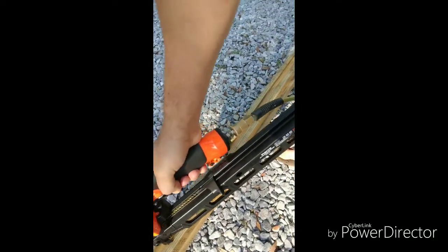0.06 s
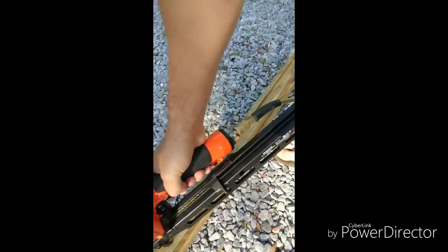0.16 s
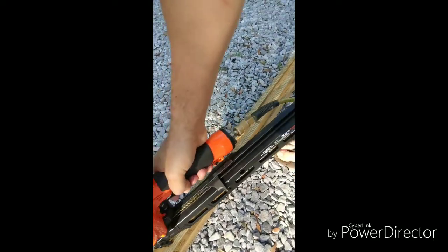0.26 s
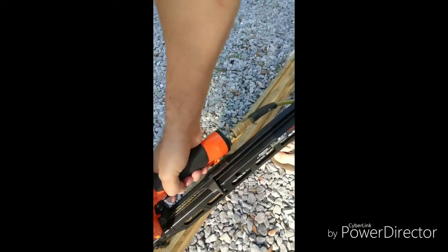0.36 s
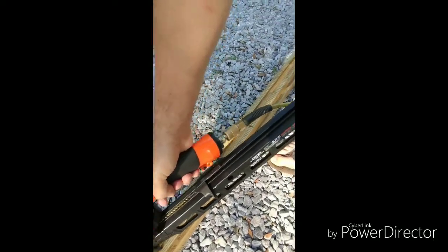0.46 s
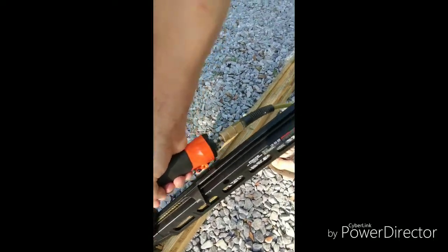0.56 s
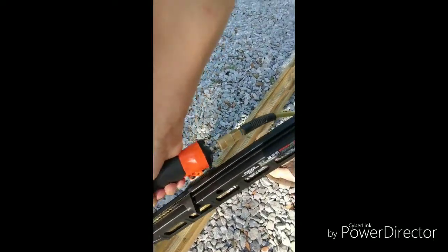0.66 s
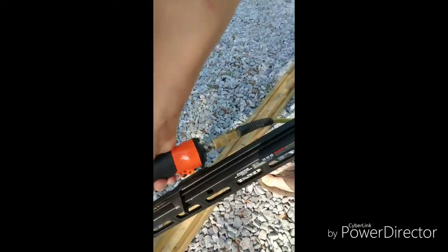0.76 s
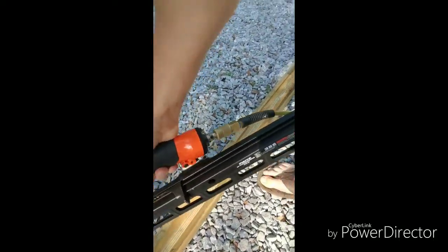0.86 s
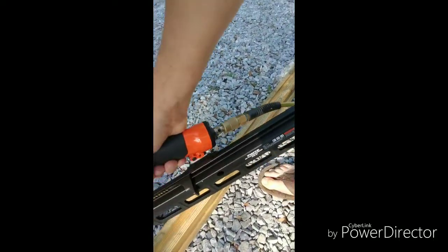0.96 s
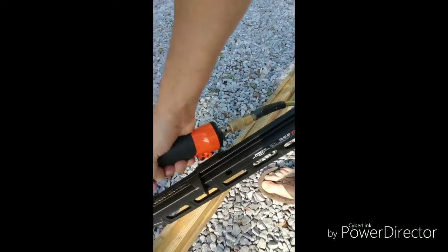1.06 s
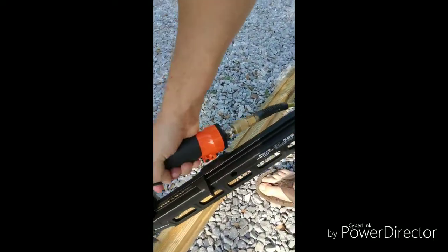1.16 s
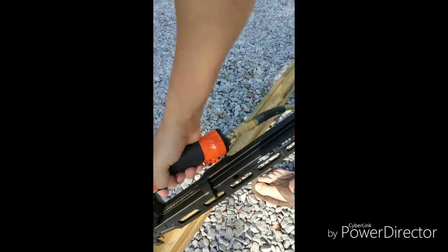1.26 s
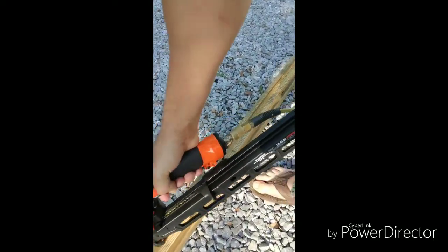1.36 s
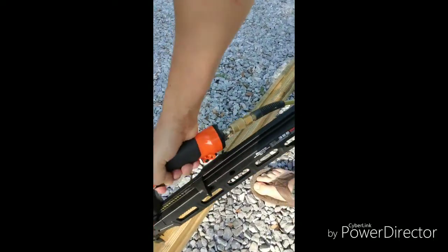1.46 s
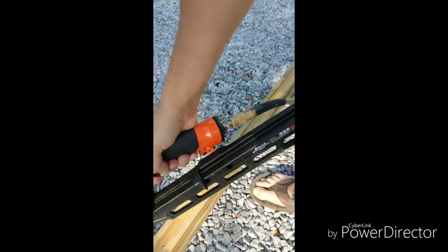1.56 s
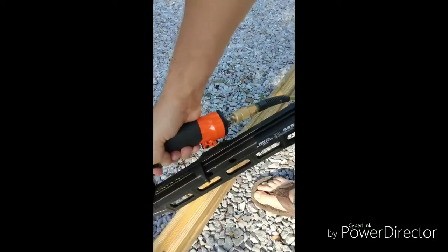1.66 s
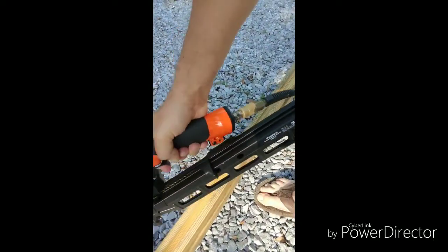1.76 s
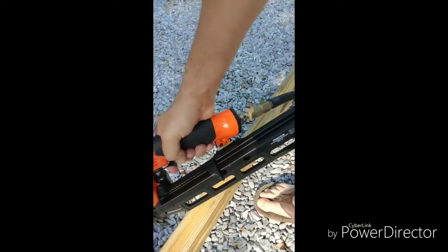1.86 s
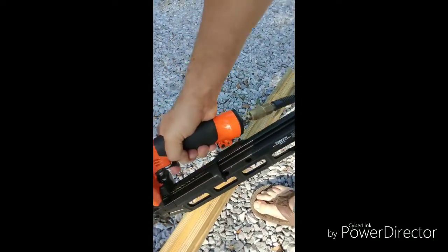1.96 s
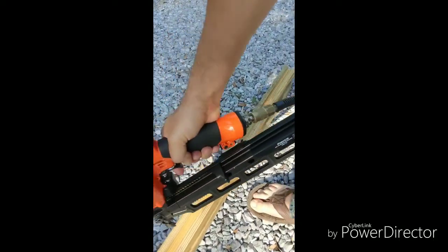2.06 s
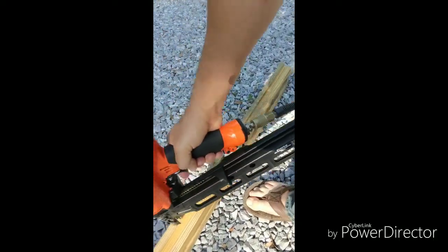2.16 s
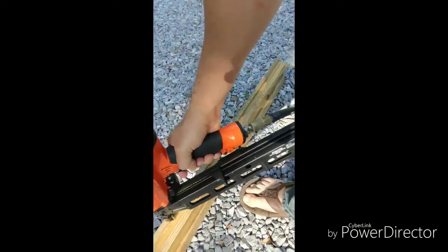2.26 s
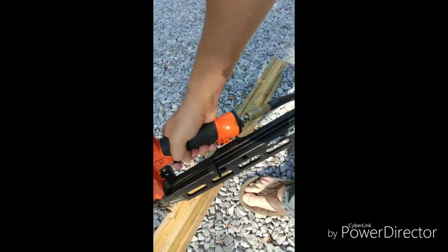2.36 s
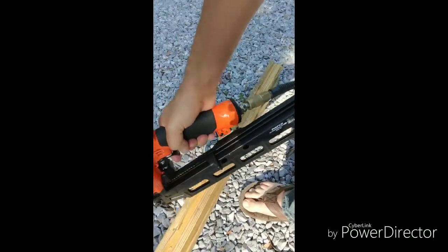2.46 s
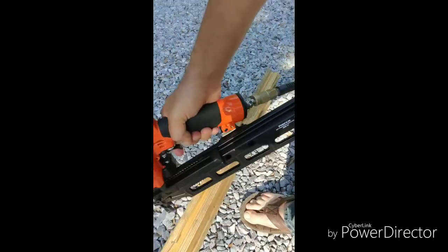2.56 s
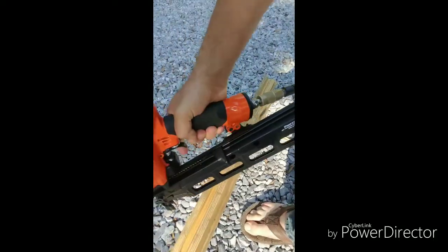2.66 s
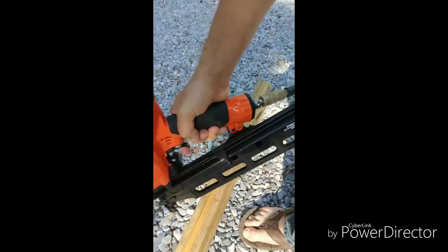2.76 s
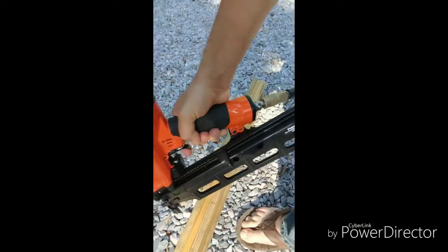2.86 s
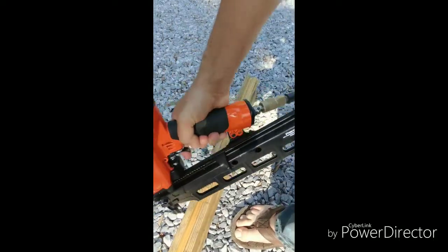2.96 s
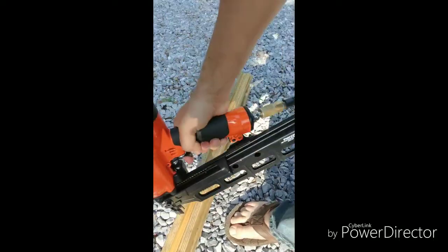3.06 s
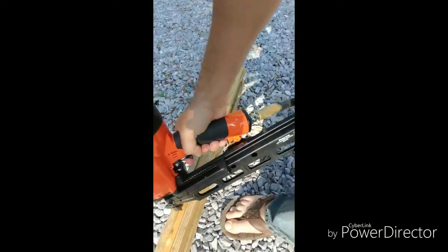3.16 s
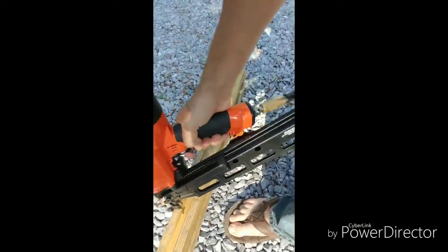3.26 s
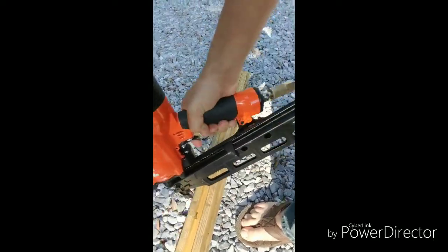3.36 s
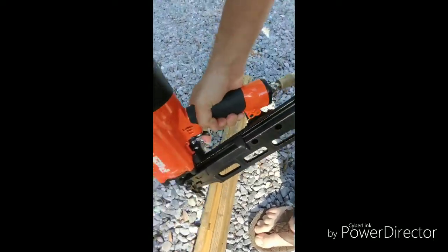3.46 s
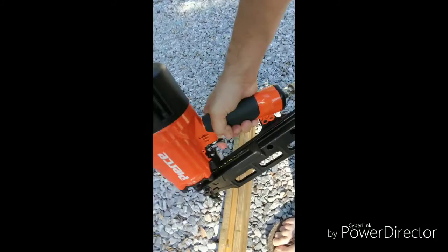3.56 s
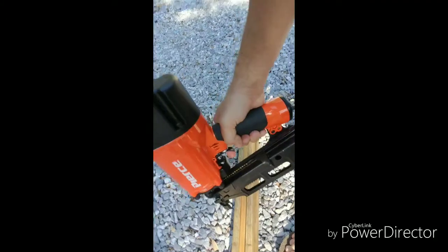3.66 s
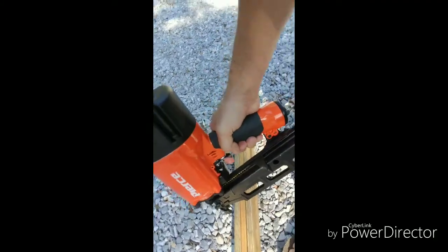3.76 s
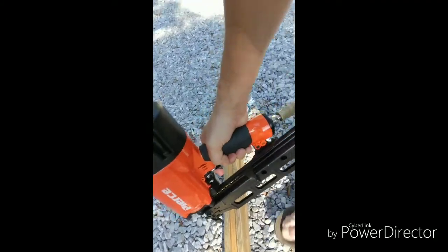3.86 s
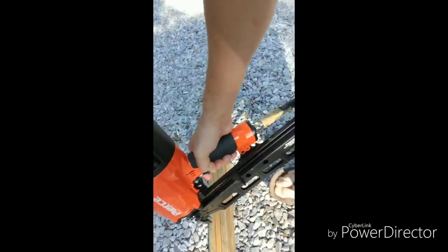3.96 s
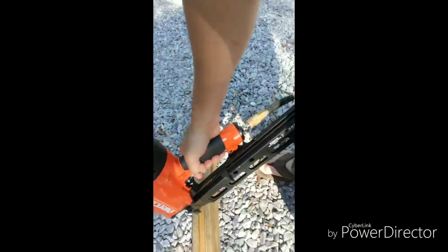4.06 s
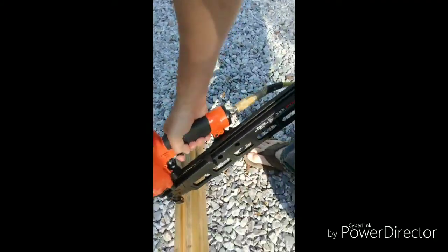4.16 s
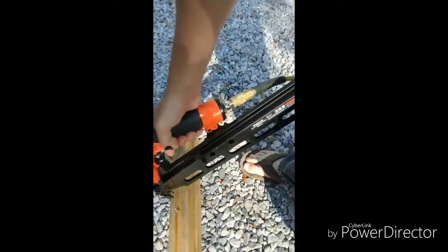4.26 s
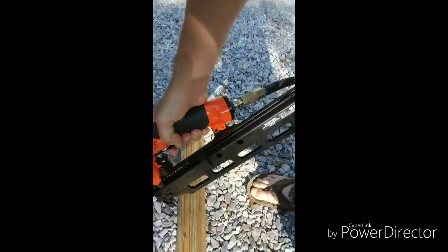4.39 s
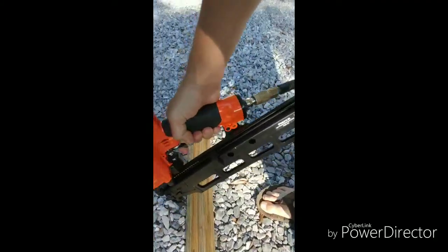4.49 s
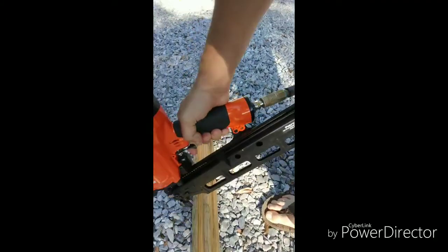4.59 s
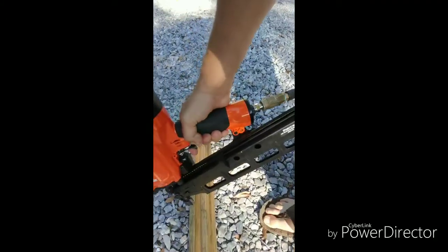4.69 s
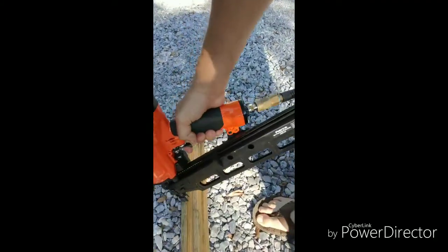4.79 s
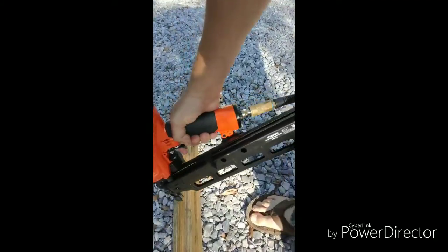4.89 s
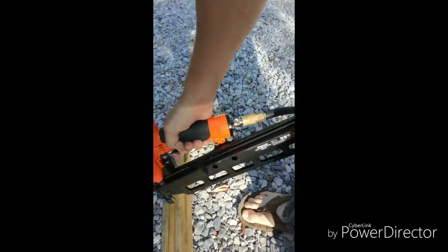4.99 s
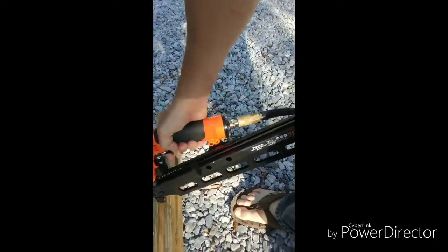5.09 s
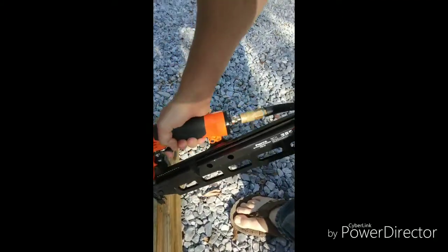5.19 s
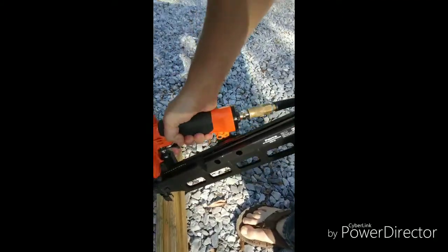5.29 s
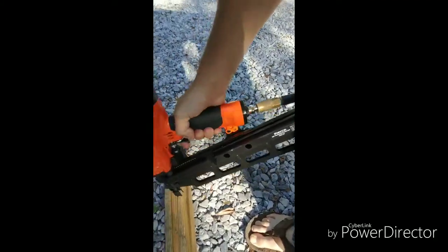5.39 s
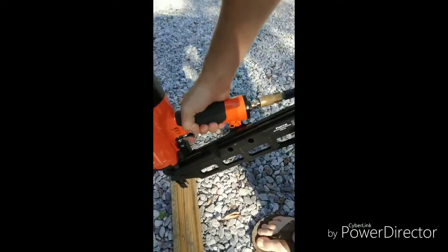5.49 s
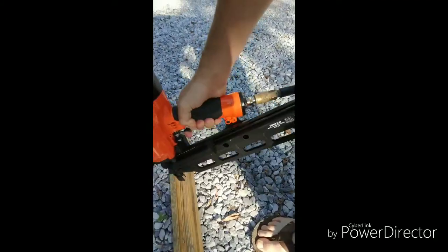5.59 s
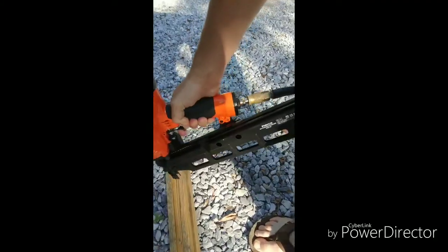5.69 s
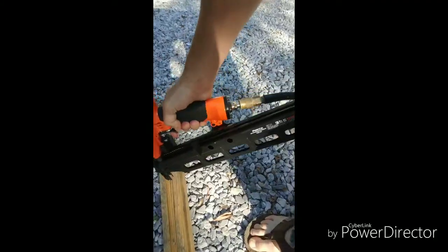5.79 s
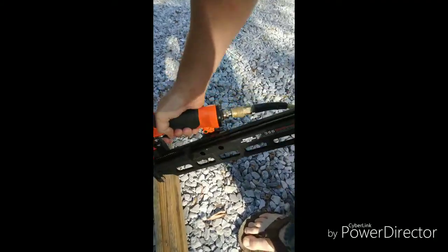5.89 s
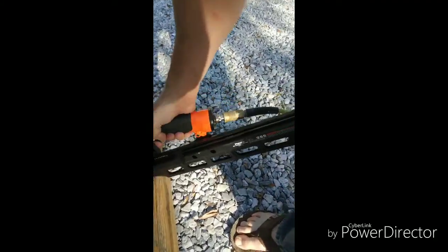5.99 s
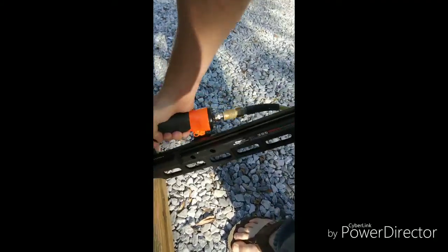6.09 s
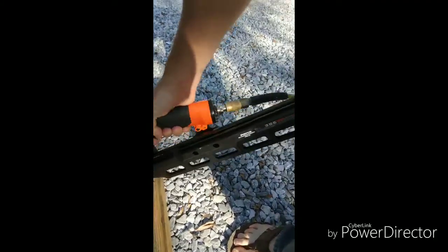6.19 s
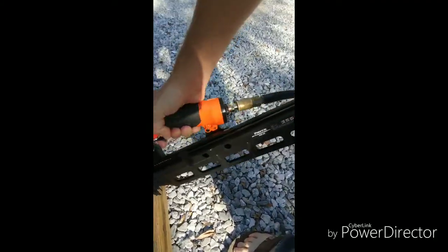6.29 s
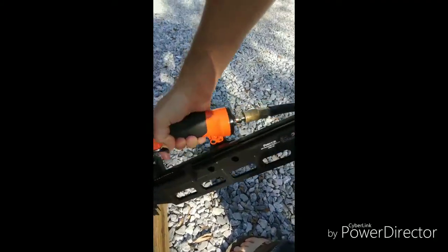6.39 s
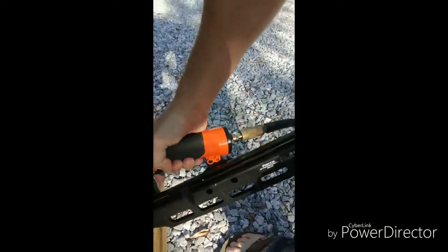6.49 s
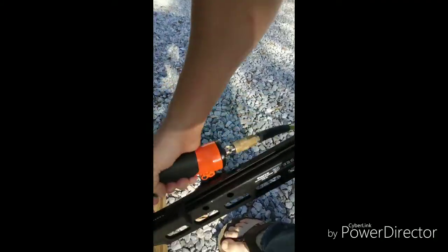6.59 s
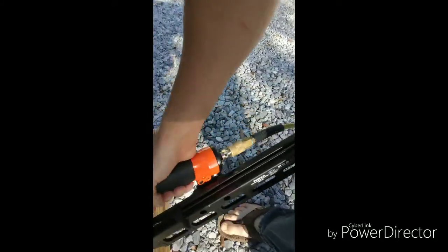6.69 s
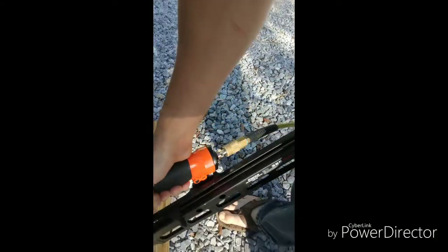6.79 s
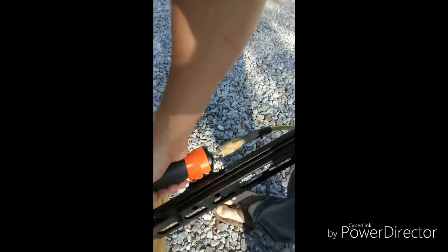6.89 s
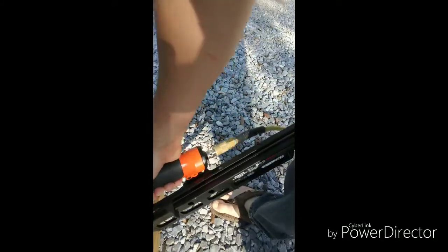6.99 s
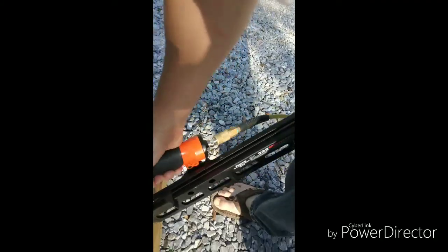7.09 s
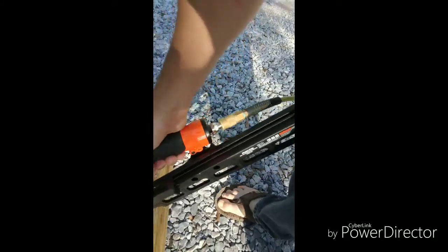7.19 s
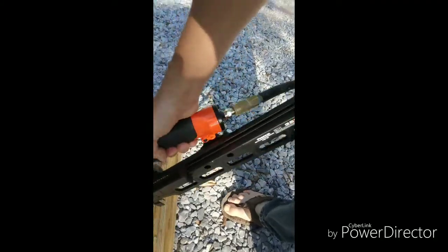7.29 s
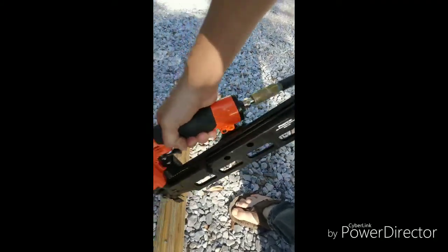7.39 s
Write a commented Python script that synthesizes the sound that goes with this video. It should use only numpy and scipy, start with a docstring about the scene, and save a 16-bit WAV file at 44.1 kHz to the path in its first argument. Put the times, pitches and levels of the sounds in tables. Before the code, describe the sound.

Close-up outdoor air nailer: eight sharp slams, each with a quick burst of exhaust air and a piston knock, with small metallic rattles between.

```python
"""Nail gun at work outdoors

A pneumatic framing nailer drives eight nails into a board lying on gravel, close to the microphone.
Each shot: the trigger spits air, a valve knocks open, the piston slams the nail home and the housing rings.
On release, air rushes out as shaped noise and the piston knocks back. Solid parts ring as fading sine waves.
Between shots the tool clacks and rattles and gravel crunches, over faint echo, wind and a far hum."""
import sys
import numpy as np
from scipy import signal
from scipy.fft import rfft, irfft, next_fast_len
from scipy.io import wavfile

SR = 44100
rng = np.random.default_rng(int(sys.argv[2]) if len(sys.argv) > 2 else 0)


def put_to_file(sound):
    """Save the sound as 16-bit audio at rate SR, in the file named by the first command-line argument."""
    columns = np.atleast_2d(sound).T  # one column per channel
    safe = np.clip(columns, -1, 1)
    whole_steps = np.round(safe * 32767)
    wavfile.write(sys.argv[1], SR, whole_steps.astype(np.int16))


N = 328456   # length of the scene in samples
TIME = np.arange(N) / SR   # seconds since the scene began
AGE = np.arange(SR // 3) / SR   # seconds since one short event began

# In all tables, level_db is a relative level; t60_s is the time to fade by 60 dB.
# The eight shots; the four levels adjust each part of a shot:
# (trigger_s, nail_driven_s, exhaust_s, trigger_db, valve_db, recoil_db, housing_ring_db)
SHOTS = [(.588, .611, .663, 0, 0, -4, -1), (1.431, 1.460, 1.552, 1, 0, 4, 2),
         (2.315, 2.349, 2.410, -1, 1.5, -1.5, 3), (3.245, 3.272, 3.3555, 1.5, -1, -2, -2.5),
         (4.182, 4.210, 4.2955, 2, 0, -2, 0), (5.151, 5.187, 5.270, -3, 1, 1, -.5),
         (6.066, 6.106, 6.206, -2.5, -1, -3.5, -2), (7.090, 7.119, 7.206, 1.5, 0, 1, -2.5)]
# extra short hisses around one pitch: air spitting past the valves, and at 4.143 s the safety tip sliding:
# (start_s, length_s, level_db, pitch_hz)
HISSES = [(.589, 0.02, 5, 7870), (3.397, 0.037, -4, 6290), (4.143, 0.03, -33, 7440),
          (7.274, 0.025, -6, 7300)]
EXHAUST_DB = 0.08   # level adjustment of every exhaust


def nailer():
    """Eight firing cycles of air and impacts, and the stray short hisses."""
    out = np.zeros(N)
    for trigger_s, drive_s, exhaust_s, trigger_db, valve_db, recoil_db, ring_db in SHOTS:
        add(out, trigger_s, trigger(trigger_db))
        add(out, drive_s - .0105, amp(valve_db) * valve_opens())
        add(out, drive_s, blow(recoil_db, ring_db))
        add(out, exhaust_s - .012, trigger_release())
        add(out, exhaust_s - .002, piston_return())
        add(out, exhaust_s, amp(EXHAUST_DB) * exhaust())
    for start_s, length_s, level_db, pitch_hz in HISSES:
        add(out, start_s, hiss(length_s, level_db, pitch_hz))
    return out


# colour of the small trigger air puff: (pitch_hz, level_db)
PILOT = [(60, -16), (300, -6), (700, -0.5), (1100, 2), (1800, 0.5), (3500, -2.5), (5500, -2.5), (8000, -3),
         (12000, -10), (16000, -17)]
# resonances of the air passage at the trigger: (pitch_hz, width_hz, level_db)
TRIGGER_VENT = [(926, 72, -0.5), (1346, 48, 5), (2450, 150, -8), (5430, 220, 1.5), (7100, 57, -0.5)]
# ringing tones of the nose and the board, before each blow's damping: (pitch_hz, level_db, t60_s)
NOSE = [(960, -15.5, 0.055), (1306, -5, 0.11), (1350, -3.5, 0.11), (2180, -11.5, 0.05), (2850, -12, 0.055),
        (2920, -8.5, 0.04), (3180, -3.5, .042), (3510, -1.5, 0.072), (5420, -6, .07), (6260, -13.5, .08),
        (6600, -10.5, 0.076), (8030, -11, 0.073), (9600, -15, .06), (11100, -23.5, .07)]
BOARD = [(108, -1.5, 0.046), (217, -9.5, 0.039), (314, -8, 0.051), (477, -13.5, 0.022), (650, -8, 0.03),
         (897, -1.5, 0.035), (1018, -0.5, 0.065)]


def trigger(db):
    """The trigger clicks, ringing the solid parts, and vents the pilot air."""
    vent = through(TRIGGER_VENT, burst(PILOT, -12.0, rise=0.0044, hold=0.0099, t60=0.11))
    click = strike(NOSE, -26.5) + strike(BOARD[1:], -28.5)
    return amp(db) * (vent + click)


# colour of sharp, sudden air: (pitch_hz, level_db)
CRACK = [(100, -20), (900, -7.5), (2000, -2), (4500, -0.5), (5600, 0.5), (8000, 2.5), (12000, -5.5),
         (16000, -9.5)]


def valve_opens():
    """The head valve knocks open and lets the air rush onto the piston."""
    rush = through(TRIGGER_VENT, burst(CRACK, -7.5, rise=0.0006, hold=0.001, t60=.065))
    return rush + strike(BOARD[1:], -10.0) + strike(BOARD[:1], -22.5)


# colour of a dull, heavy impact: (pitch_hz, level_db)
THUD = [(30, -8), (90, -7), (350, 2), (650, -3), (1000, -3), (1700, -5.5), (3500, -13), (7000, -26),
        (16000, -46)]
# ringing tones of the cylinder housing, before each blow's damping: (pitch_hz, level_db, t60_s)
HOUSING = [(1282, -0.5, 0.18), (1352, -11, 0.13), (1980, -18, 0.14), (2227, -14.5, 0.13),
           (3360, -13, 0.089), (3731, -19.5, .1), (5200, -4.5, .09), (5550, -6.5, 0.11), (6130, -11, 0.063),
           (6470, -9.5, 0.065), (6900, -10, .1), (8220, -9.5, 0.078), (8930, -10.5, 0.091),
           (9203, -13.5, 0.074), (9830, -16, 0.081), (11200, -16.5, .09)]


def blow(recoil_db, ring_db):
    """The driver hits the nail, which tears into the board; the piston lands on its bumper, the tool recoils."""
    out = np.zeros(N)
    crack = burst(CRACK, -1, rise=0.00046, hold=0.021, t60=0.056) * amp(1.7 * drift(rate=270))
    add(out, 0, through(TRIGGER_VENT, crack))
    seep = burst(CRACK, -24.5, rise=.01, hold=0.069, t60=0.32)   # air seeps while the cylinder stays charged
    add(out, 0, seep)
    thud = burst(THUD, 2.6, rise=0.0005, hold=.007, t60=0.034)
    add(out, .0025, thud + strike(BOARD, -3.5) + strike(NOSE, -7.5))
    add(out, .004, thump(recoil_db - 2, hz=82))
    # the board bounces on the gravel
    bounce = amp(recoil_db - 13) * np.sin(2 * np.pi * 51 * AGE) * fade(t60=0.14)
    add(out, .008, bounce)
    add(out, .014, strike(HOUSING, ring_db - 5.0, scatter_db=0.93))
    return out[:len(AGE)]


# colours of the bright jet and the duller hiss: (pitch_hz, level_db)
JET = [(40, -6), (120, -6.5), (400, -8.5), (900, -7.5), (1500, -7.5), (3000, -3), (4800, -2), (6500, 0),
       (8000, 3.5), (9500, 1.5), (11000, 1.5), (13000, -3), (16000, -1)]
BLEED = [(35, -58), (60, -25.5), (266, -16), (509, -27.5), (673, -13.5), (870, -27.5), (1260, -10.5),
         (1630, -11), (1870, -6.5), (3050, -9.5), (5990, -1), (7380, 0.5), (9540, -5), (14200, -6.5),
         (15500, -13)]
# resonances of the exhaust port and the cap over it: (pitch_hz, width_hz, level_db)
EXHAUST_PORT = [(8000, 700, -5.5), (10500, 990, -6.5)]
CAP = [(1280, 99, 3), (2320, 360, -5.5), (3760, 1100, -9), (5940, 600, -4.5), (7750, 600, -8)]
HALF_FLOW_S = 0.15255   # time until emptying halves the strength of the air


def exhaust():
    """A bright jet gives way to a duller hiss through the cap, which closes off as the cylinder empties."""
    flutter = amp(1.5 * drift(rate=220))
    # the valve never lifts quite alike, so the port pitches vary
    port = [(hz * (1 + .035 * rng.normal()), width, db) for hz, width, db in EXHAUST_PORT]
    jet = through(port, burst(JET, -.5, rise=.0004, hold=0.02, t60=0.17))
    bleed = through(CAP, burst(BLEED, -9.5, rise=0.012, hold=0.052, t60=0.38))
    pressure = 1 / (1 + (AGE / HALF_FLOW_S) ** 11)
    return (jet + bleed) * flutter * pressure


def piston_return():
    """The head valve shuts with a knock; the piston flies up, hits its stop and bounces once."""
    out = np.zeros(N)
    valve_thud = burst(THUD, -19.5, rise=.0005, hold=0.0028, t60=.12)
    add(out, 0, thump(-9.0, hz=280) + valve_thud + strike(BOARD, -22.5))
    stop_ring = strike(BOARD[1:], -14, damping=0.86) + strike(HOUSING, -24.0)
    add(out, .042, thump(-5.5, hz=514) + stop_ring)
    add(out, .0428, burst(THUD, -10, rise=.0003, hold=0.0036, t60=0.028))
    add(out, .0455, thump(-16.5, hz=520) + strike(BOARD[1:], -19, damping=1.6))
    return out[:len(AGE)]


# colour of small, bright contacts and puffs: (pitch_hz, level_db)
TICK = [(200, -14.5), (1500, -12), (4000, -8), (6800, -3), (9000, -4), (16000, -7.5)]


def trigger_release():
    """The trigger valve lets out a short puff of air as it is let go."""
    return burst(TICK, -11.5, rise=0.0055, hold=.01, t60=0.02)


def hiss(length, db, hz):
    """A short hiss mostly around one pitch, as air squeezes through a narrow gap or a part slides."""
    air = burst(TICK, db, rise=0.0019, hold=length, t60=.07)
    return amp(-8) * air + amp(1.5) * resonate(air, hz, width=1600)


def handling():
    """The tool's loose parts and the gravel underfoot; rattle, scrape and crunch share one graininess."""
    grain = amp(5 * drift(rate=350, size=N) - 4)   # uneven little contacts
    return clacks() + ticks() + rattle(grain) + scrape(grain) + crunch(grain)


# the steel nose knocks and settles: (start_s, level_db)
CLACKS = [(0.0354, -1), (.043, 1.5), (.099, -26.5), (3.818, -19), (6.068, -4), (7.068, -24.5)]


def clacks():
    """Each knock rings the nose and adds a short clatter of noise."""
    out = np.zeros(N)
    for start_s, db in CLACKS:
        clatter = through(TRIGGER_VENT, burst(PILOT, db - 19, rise=0.00036, hold=.001, t60=0.058))
        add(out, start_s, clatter + strike(NOSE, db - 19.5))
    return out


# the sharpest ticks of the nail strip and fittings: (start_s, level_db, pitch_hz)
TICKS = [(.13, -32.5, 9010), (.217, -35, 11500), (.401, -31.5, 5680), (.414, -33, 10500),
         (3.7342, -16.5, 6980), (3.76, -14.5, 6310), (3.7898, -12.5, 7500), (3.8191, -13, 7000),
         (3.927, -29, 3500), (3.968, -17, 9500), (5.6965, -23, 7520), (5.9323, -27, 9020),
         (6.033, -29, 7940), (7.069, -29, 7540)]
# each shift of the tool makes the nail strip slide, with lesser ticks: (start_s, length_s, level_db)
SHIFTS = [(1.0, 0.23, -42.5), (3.651, .064, -18.5), (3.769, 0.047, -21), (5.621, 0.062, -32.5),
          (5.723, .28, -35.5), (6.691, .14, -41.5)]
# colour of gritty contact noise: (pitch_hz, level_db)
GRIT = [(88, -43.5), (150, -17), (182, -23), (279, -4), (472, -18.5), (1480, -10), (3690, -15),
        (7290, -6.5), (15500, -22.5)]


def ticks():
    """Small contacts each give a sharp, pitched snap and a longer gritty tail."""
    out = np.zeros(N)
    lesser = [tick for start_s, length_s, db in SHIFTS for tick in tick_run(start_s, length_s, db, count=5)]
    for start_s, db, hz in TICKS + lesser:
        snap = through([(hz, 900, 10)], burst(TICK, db - 11.5, rise=0.00022, hold=0.00069, t60=0.01))
        tail = burst(GRIT, db - 24.5, rise=.001, hold=.002, t60=.09)
        add(out, start_s, snap + tail)
    return out


SHIFT_HZ, SHIFT_SCATTER_DB = 7945, 2.5   # typical pitch of the lesser ticks, spread of their levels


def tick_run(start, length, db, count):
    """Unevenly spaced ticks, each with its own strength and pitch: (start_s, level_db, pitch_hz)."""
    run = []
    for k in range(count):
        start_s = start + length * (k + rng.random()) / count
        level_db = db + SHIFT_SCATTER_DB * rng.normal()
        pitch_hz = SHIFT_HZ * (1 + .08 * rng.normal())
        run.append((start_s, level_db, pitch_hz))
    return run


# resonances of the magazine shell that holds the loose nails: (pitch_hz, width_hz, level_db)
MAGAZINE = [(1350, 110, 12), (2000, 700, 6.5), (5450, 150, 5)]
RATTLE_DB = -49   # level before the grain and the magazine resonances
RATTLE_ATTACK_S, RATTLE_LENGTH_S, RATTLE_T60_S = .01, .17, .18


def rattle(grain):
    """Loose nails jostle after the first clack until the tool comes to rest; the magazine colours them."""
    effort = swell(CLACKS[0][0], RATTLE_LENGTH_S, RATTLE_ATTACK_S, RATTLE_T60_S)
    jostle = noise(PILOT, size=N) * amp(RATTLE_DB) * effort
    return through(MAGAZINE, jostle * grain)


SCRAPE_BELOW_DB = 19.5   # how far the sliding is set below the level of its shift
SCRAPE_ATTACK_S, SCRAPE_T60_S = .012, .06


def scrape(grain):
    """The nail strip slides at each shift: grainy noise around one pitch."""
    sliding = sum(amp(db - SCRAPE_BELOW_DB) * swell(start_s, length_s, SCRAPE_ATTACK_S, SCRAPE_T60_S)
                  for start_s, length_s, db in SHIFTS)
    return resonate(noise(TICK, size=N) * sliding * grain, SHIFT_HZ, width=2500)


# a sandal presses into the gravel: (start_s, length_s, level_db)
STEPS = [(3.657, 0.03, -37), (3.792, 0.025, -36.5), (3.962, .02, -45.5)]
STEP_ATTACK_S, STEP_T60_S = 0.026, .36


def crunch(grain):
    """Pressed gravel makes gritty noise from many uneven contacts."""
    pressing = sum(amp(db) * swell(start_s, length_s, STEP_ATTACK_S, STEP_T60_S)
                   for start_s, length_s, db in STEPS)
    return noise(GRIT, size=N) * pressing * grain


# the nose bumps on the board: (start_s, level_db)
BUMPS = [(.025, -37.5), (.101, -33.5), (.2, -38), (3.82, -23), (6.78, -47.5), (7.067, -34.5)]


def bumps():
    """A soft contact briefly stirs the board and the lowest housing tones, damped by the hand."""
    out = np.zeros(N)
    for start_s, db in BUMPS:
        knock = burst(THUD, db - 2.0, rise=0.00094, hold=0.0027, t60=0.057) + strike(BOARD, db - 11.5)
        add(out, start_s, knock + strike(HOUSING[:4], db - 3, damping=6.2))
    return out


# scatter from trees and buildings: (pitch_hz, level_db, t60_s)
YARD = [(250, -50, 1.3), (520, -42.5, 0.94), (800, -43, 2.4), (1500, -35.5, 0.99), (3000, -33, 1.9),
        (5000, -31.5, 0.92), (8000, -40.5, 1.3), (14000, -51.5, 0.6)]


def yard(x):
    """Faint diffuse echo from the surroundings: bands of noise that fade at different rates."""
    age = np.arange(int(1.5 * SR)) / SR
    hz, level, t60 = np.transpose(YARD)
    edges = np.geomspace(100, 18000, num=12)   # band limits in Hz
    echo = 0
    for low, high in zip(edges, edges[1:]):
        centre = np.log(low * high) / 2   # on a log frequency scale
        band_filter = signal.butter(2, [low, high], "band", fs=SR, output="sos")
        band = signal.sosfilt(band_filter, rng.standard_normal(len(age)))
        band_t60 = np.interp(centre, np.log(hz), t60)
        decay = np.exp(-np.log(1000) * age / band_t60) * (1 - np.exp(-age / 0.027))
        gain = amp(np.interp(centre, np.log(hz), level))
        echo = echo + gain * band * decay / np.linalg.norm(decay)
    return signal.fftconvolve(x, echo)[:N]


# colours of the still air and of the wind on the microphone: (pitch_hz, level_db)
AIR = [(25, -20), (70, -5.5), (150, 2.5), (280, -0.5), (600, -4), (1300, -6.5), (2200, -12), (4000, -15),
       (5200, -13), (7500, -20.5), (15000, -19)]
RUMBLE = [(25, -21.5), (55, -5), (95, 0), (135, -2.5), (250, -21.5), (1000, -56.5), (4000, -81)]
AIR_DB = -57
# gusts of light wind on the microphone: (start_s, level_db)
GUSTS = [(.2, -57), (.85, -56.5), (2.7, -61), (3.4, -52), (4.4, -61.5), (6.5, -53.5)]
CALM_DB, GUST_ATTACK_S, GUST_HOLD_S, GUST_T60_S = -63, 0.15, .25, 1.6
# a far machine hums now and then: (start_s, length_s)
HUM_SPELLS = [(1.647, .6), (5.3, 1.1)]
HUM_HZ, HUM_DB, HUM_ATTACK_S, HUM_T60_S = 180, -56.5, 0.31, 1.2   # pitch and level wander around these


def outdoors():
    """Still air and gusty wind as soft noise, and a distant hum as a wavering sine."""
    air = amp(AIR_DB) * noise(AIR, size=N)
    gusts = sum(amp(db) * swell(start_s, GUST_HOLD_S, GUST_ATTACK_S, GUST_T60_S) for start_s, db in GUSTS)
    breeze = amp(CALM_DB) + gusts
    wind = noise(RUMBLE, size=N) * breeze * amp(2.5 * drift(rate=8.1, size=N))
    cycles = np.cumsum(HUM_HZ * (1 + 0.0072 * drift(rate=8.8, size=N))) / SR
    running = sum(swell(start_s, length_s, HUM_ATTACK_S, HUM_T60_S) for start_s, length_s in HUM_SPELLS)
    hum = np.sin(2 * np.pi * cycles) * running * amp(HUM_DB + 1.5 * drift(rate=12, size=N))
    return air + wind + hum


def strike(modes, db, damping=0.92, scatter_db=2.0):
    """One blow on a body: fading sines, each with a slightly different share each time."""
    out = np.zeros(len(AGE))
    for k, (hz, level, t60) in enumerate(modes):
        age = AGE[AGE < t60 / damping]
        level_db = db + level + scatter_db * rng.normal()
        decay = np.exp(-np.log(1000) * age * damping / t60)
        sign = (-1) ** k   # neighbouring tones start in opposite directions
        add(out, 0, sign * amp(level_db) * np.sin(2 * np.pi * hz * age) * decay)
    return out


def thump(db, hz):
    """One swing of pressure from a sudden push, strongest around the given frequency."""
    phase = 2 * np.pi * hz * AGE - np.pi
    return amp(db) * phase * np.exp((1 - phase ** 2) / 2)


def burst(spectrum, db, rise, hold, t60):
    """A puff of noise that swells, holds and dies; times in seconds."""
    return amp(db) * noise(spectrum) * (1 - np.exp(-AGE / rise)) * fade(t60, hold)


def through(passage, x):
    """Noise picks up the resonances of the passage or part that it runs through."""
    return x + sum(amp(db) * resonate(x, hz, width) for hz, width, db in passage)


def resonate(x, hz, width):
    """A resonance with gain about 1 at its top; pitch and width in Hz."""
    r = np.exp(-np.pi * width / SR)   # nearer 1 rings longer
    feed = np.array([1, 0, -1]) * (1 - r * r) / 2
    feedback = [1, -2 * r * np.cos(2 * np.pi * hz / SR), r * r]
    return signal.lfilter(feed, feedback, x)


def noise(spectrum, size=len(AGE)):
    """Steady noise of a given colour, rms 1."""
    hz, db = np.transpose(spectrum)
    padded = next_fast_len(size, real=True)
    grid = np.maximum(np.fft.rfftfreq(padded, 1 / SR), 1)
    gain = amp(np.interp(np.log(grid), np.log(hz), db))
    return rms_one(irfft(rfft(rng.standard_normal(padded)) * gain, padded)[:size])


def drift(rate, size=len(AGE)):
    """Random wander around zero, joining rate random points per second by straight lines."""
    knots = rng.standard_normal(4096)
    return np.interp(np.arange(size) / SR * rate, np.arange(len(knots)), knots)


def fade(t60, hold=0):
    """Full strength for the hold time, then an exponential decay."""
    return np.exp(-np.log(1000) * np.maximum(AGE - hold, 0) / t60)


def swell(s, length, attack, t60):
    """An effort that builds from time s, begins to die away after its length, and fades."""
    rise = np.clip((TIME - s) / attack, 0, 1)
    return rise * amp(-60 * np.maximum(TIME - s - length, 0) / t60)


def amp(db):
    """Decibels to gain."""
    return np.exp(np.asarray(db) * np.log(10) / 20)


def rms_one(x):
    """Scale to unit power."""
    return x / np.sqrt(np.mean(x ** 2) + 1e-20)


def add(out, s, sound):
    """Mix a sound in at time s."""
    start = max(round(s * SR), 0)
    out[start:start + len(sound)] += sound[:N - start]


def scene():
    """The tool, its echo and the quiet outdoors."""
    tool = nailer() + handling() + bumps()
    return (tool + yard(tool) + outdoors())[None]


CUTOFF_HZ = 15550   # top of the treble that gets through


def record(dry):
    """The microphone sheds the deepest bass, the input overloads with a short knee, and the top is cut."""
    thinned = signal.sosfilt(signal.butter(2, 33, "high", fs=SR, output="sos"), dry)
    clipped = thinned / (1 + np.abs(thinned / .94) ** 8) ** (1 / 8)   # peaks flatten towards .94
    return signal.sosfilt(signal.ellip(12, .1, 70, CUTOFF_HZ, fs=SR, output="sos"), clipped)


dry = scene()
out = record(dry)
put_to_file(out)
```